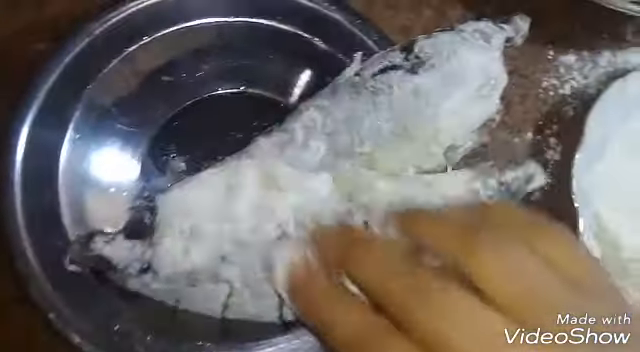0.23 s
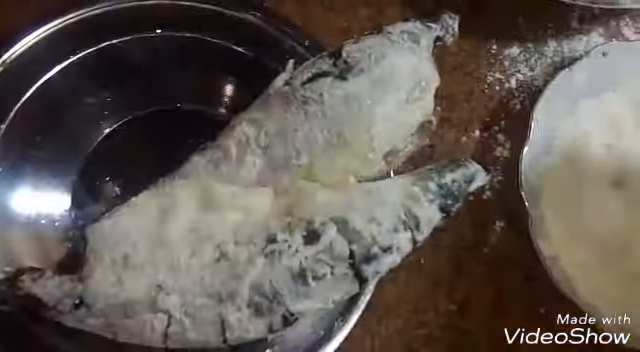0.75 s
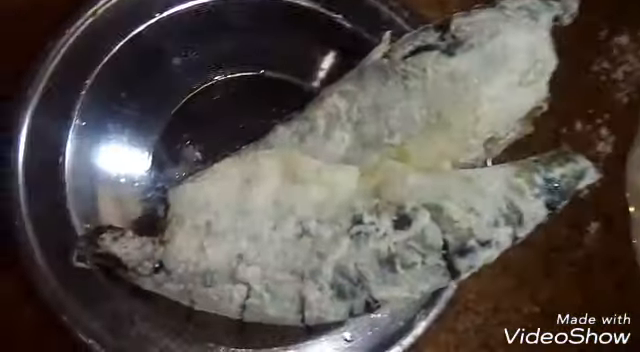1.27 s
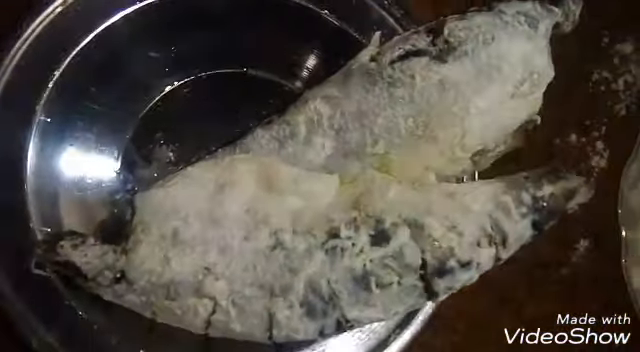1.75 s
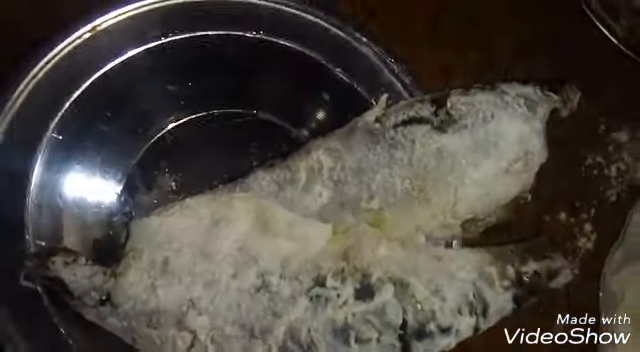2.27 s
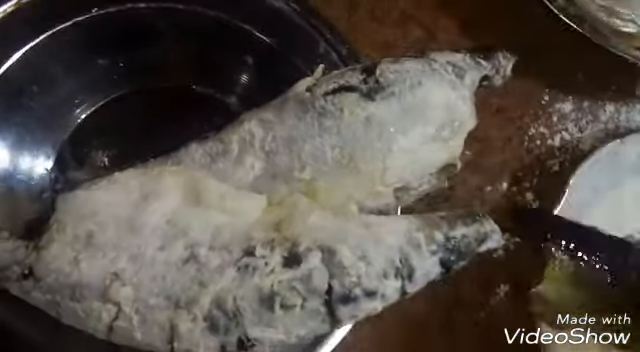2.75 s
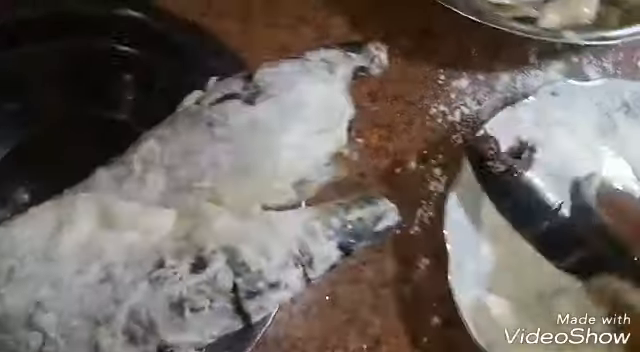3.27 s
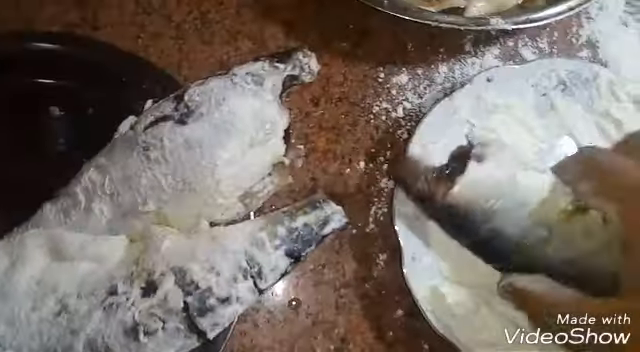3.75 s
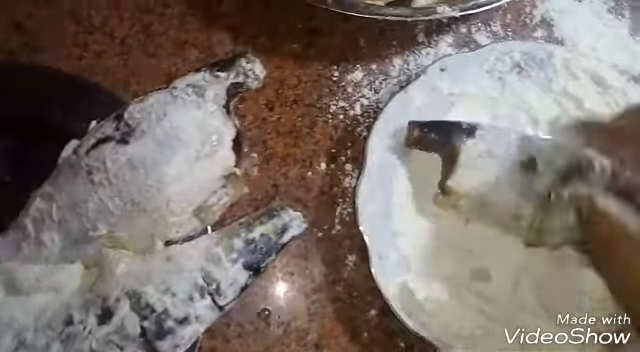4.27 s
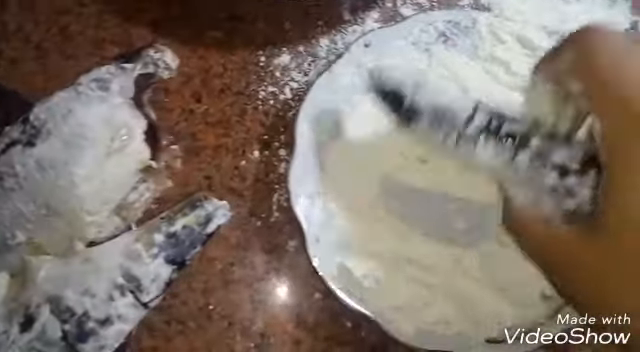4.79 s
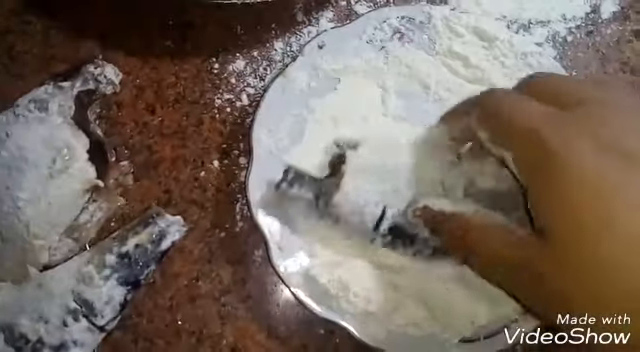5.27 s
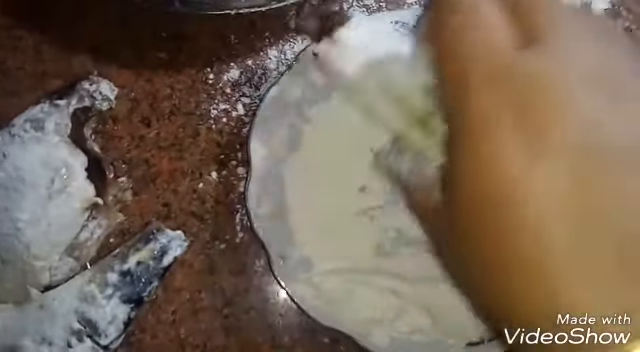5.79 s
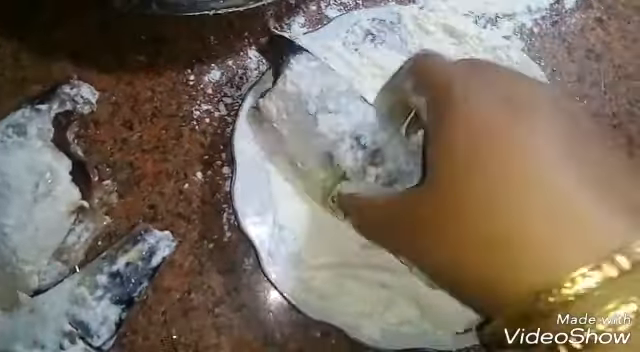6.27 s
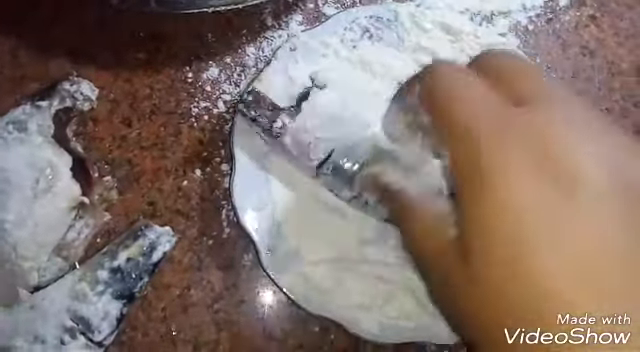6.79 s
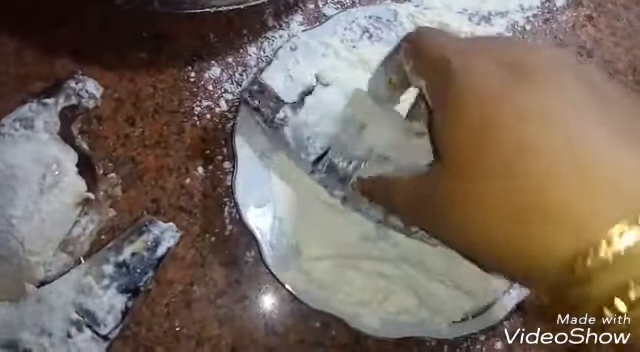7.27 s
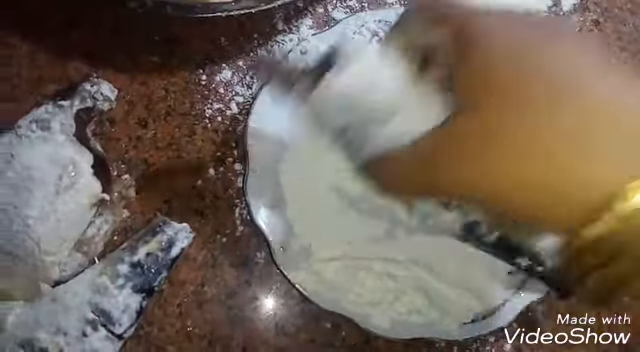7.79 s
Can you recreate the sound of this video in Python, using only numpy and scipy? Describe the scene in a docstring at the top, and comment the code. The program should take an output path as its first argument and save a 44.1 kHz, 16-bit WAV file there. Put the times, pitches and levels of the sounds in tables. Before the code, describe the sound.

Quiet low hum and patchy hiss; brief scuffing pats, tiny ticks, then scattered ceramic clacks on stone, peaking in hard double knocks.

```python
"""A small hard-walled kitchen: a fan hums with one blade tone under a patchy hiss, made from shaped noise and a sine.
First floury fingers pat and rub a fish on a steel dish (noise scuffs through resonances), then a bangle pings
and small things tick (brief partials). From 3.4 s to 6.9 s a plate rocks and knocks on a stone counter, hardest
near 5.1 s (struck modes plus gritty chatter); a last tick follows. Soft low bumps (damped sines) come now and then.
A hand-held phone hears it through two ports; the left one is shaded and dull."""
import sys
import numpy as np
from scipy import signal
from scipy.fft import rfft, irfft, next_fast_len
from scipy.io import wavfile
from scipy.ndimage import uniform_filter1d

SR = 44100
rng = np.random.default_rng(int(sys.argv[2]) if len(sys.argv) > 2 else 0)


def dump(signal):
    """Clip the signal to [-1, 1] and save it as 16-bit WAV at the path in sys.argv[1]."""
    limited = np.clip(np.atleast_2d(signal).T, -1, 1)
    pcm = np.round(limited * 32767).astype(np.int16)
    wavfile.write(sys.argv[1], SR, pcm)


N = 354651

# Fan rumble spectrum: f/Hz, relative level/dB
FAN_SPECTRUM = [(15, -57.5), (25, -41.5), (37, -27.5), (59, -21), (145, -15), (273, -13), (339, -6.5),
                (361, -11), (390, -12.5), (421, -11.5), (531, -16.5), (757, -27.5), (1000, -38),
                (1300, -65.5), (2200, -120)]
# Duct resonances that lift the rumble: f/Hz, width/Hz, lift/dB
DUCT_MODES = [(119.5, 14, 7), (152.1, 3.6, 12), (191.6, 5.2, 4), (353.2, 29, 2.5)]
# Fan rumble as the phone drifts over the counter: t/s, level/dB
FAN_LEVEL = [(0, -50), (.7, -53), (1.2, -50.5), (2.7, -50.5), (3.8, -52), (4.6, -52), (6.4, -52.5),
             (8.04, -52)]
BLADE_HZ = 392.5
BLADE_DB = 4  # peak of the blade tone over the rms of the rumble
FAN_LAG_S = .0003  # the fan reaches the left port later

# Hiss spectrum: f/Hz, relative level/dB
HISS_SPECTRUM = [(410, -21.5), (700, -7.5), (962, -17.5), (1070, -13.5), (1160, -15), (1590, -7),
                 (2230, -12), (3160, -7), (3870, -3), (5720, -1.5), (8100, -27.5), (10500, -64),
                 (17800, -120)]
# Hiss below 1.6 kHz, up to 3.2 kHz and above: t/s, low level/dB, middle level/dB, high level/dB
HISS_LEVEL = [(0, -71, -68, -61), (.4, -65, -64.5, -59), (.67, -70.5, -66.5, -63), (.95, -72.5, -69.5, -65),
              (1.3, -68, -60.5, -61), (1.6, -71.5, -68, -65.5), (1.93, -65.5, -64.5, -62.5),
              (2.4, -69, -67, -64), (3.2, -65, -69, -64.5), (3.6, -64.5, -63.5, -60.5),
              (4.05, -71.5, -68, -63.5), (4.9, -70.5, -69, -63), (5.749, -74, -72.5, -63),
              (6.349, -70.5, -66, -61.5), (6.7, -74.5, -72, -62.5), (7.05, -63.5, -63, -63.5),
              (7.351, -73, -69, -65.5), (7.72, -69.5, -67.5, -61.5), (8.04, -74.5, -69, -64)]
# Faint uneven hiss at the very top: f/Hz, relative level/dB
TOP_HISS_SPECTRUM = [(7500, -60), (8500, 0), (10500, -2), (13000, -8), (15000, -40)]
TOP_HISS_DB = -71

# Bands of the room tail: f/Hz, level/dB, time to fall 60 dB/s
ROOM_BANDS = [(262, -26.5, 0.604), (671.4, -37.5, 0.42), (1330, -32, 0.41), (2470, -36, 0.49),
              (4350, -30, 0.35), (6500, -19, 0.23)]
# Dull bumps: t/s, peak level/dB, f/Hz
BUMPS = [(0.075, -45, 118), (0.98, -42.5, 89), (2.224, -50, 140), (6.301, -44.5, 79.3)]

# Small ticks: t/s, peak level/dB, f/Hz
TICKS = [(1.755, -37, 3620), (1.770, -40, 3020), (1.7898, -38, 2960), (1.8208, -32, 3790),
         (2.2036, -44.5, 6040), (4.639, -41.5, 4970), (4.9277, -46.5, 6500), (5.6983, -49, 3036),
         (7.6591, -48, 4170)]
TICK_T60_S = .018
# A bangle touches its neighbour: t/s, peak level/dB
CLINKS = [(1.437, -32.5)]
# Modes of the bangle: f/Hz, relative level/dB, time to fall 60 dB/s
BANGLE_MODES = [(5220, 0, .05), (6280, -2, .035), (7600, 0, .05), (10300, 8, .035), (11000, 12, .03)]

# Floury fingers sliding on the fish between the pats: t/s, level/dB
RUB_LEVEL = [(0, -74), (.04, -47.5), (.13, -51), (.2, -61), (.3, -55.5), (.36, -64), (.42, -65), (.47, -81),
             (.62, -77)]
# Fingers patting the fish: t/s, peak level/dB, dish note f/Hz, flour rustle level/dB, fade/ms
PATS = [(0.036, -36.5, 2180, 7, 25), (0.05, -28, 2040, -11, 5.6), (0.102, -36.5, 2010, -5, 13.4),
        (0.1145, -46, 1950, 7, 15), (0.169, -43, 1980, -17, 5.6), (0.22, -41.5, 1930, -11, 8.9),
        (0.2638, -39.5, 2540, -14, 7.2), (0.2953, -37.5, 1940, -14, 5.3), (0.374, -43, 1930, -11, 10),
        (0.4015, -30, 1920, -26, 5.6), (0.412, -42.5, 1890, 2, 5.9), (0.603, -46.5, 1860, -4.5, 12)]
PAT_RISE = .33  # share of the fade that a scuff takes to build

# Plate rim on stone: t/s, peak level/dB, brightness/(dB an octave), low body lift/dB, ring lift/dB,
#   left minus right/dB, weight in the counter/dB, chatter fade/ms, body f/Hz, favoured note f/Hz
KNOCKS = [(3.3775, -21, -3.5, 0, -8, -10, -38, 0.96, 768, 1450),
          (3.384, -21.5, -3, 7.5, -6, -2, -16, 5.2, 794, 2500),
          (3.651, -41.5, -3, 19, -15, -9, -3, 2.6, 780, 2010),
          (3.660, -37, 3.5, 19, -4, -8, -2.5, 3, 755, 2500),
          (4.245, -37.5, -5.5, -1, -21, -11, -24, 2.1, 766, 1450),
          (4.251, -28, -4.5, 0, -2, -4.5, -14, 1.3, 730, 2930),
          (4.289, -31.5, -6, 2, -6, -11, -38, 2, 780, 1600),
          (4.3015, -11, -3.5, -7.5, -2, -1.5, -29.5, 4.5, 860, 1600),
          (4.3109, -9.5, -1.5, -10.5, -5.5, 1, -30, 3.6, 760, 2740),
          (4.3175, -17, -2, 4.5, -7, -3.5, -20, 3.5, 750, 1880),
          (5.1065, -1.5, .5, -6, 5, 3, -38, 6, 690, 3000), (5.1172, -1, .5, -4, 3, -1, -37, 4, 670, 2200),
          (5.122, -8, 0, -5, 3, -1, -36, 5, 670, 1850), (5.1970, -2.5, .5, -6, 1, 4, -32, 5, 720, 1850),
          (5.2052, -1.5, 0, -6, -1, -1, -32, 4.5, 670, 1600),
          (5.374, -10.5, 1, -1, -2, -1, -40, 3.7, 667, 2520),
          (5.3773, -7.5, 2.5, -2.5, -3.5, 7, -28, 5, 657, 2100),
          (5.996, -41, -7, 7, -5, -5.5, -2, 2.5, 736, 1610),
          (6.004, -43.5, -14.5, 4.5, -1, -9, -11, 2.5, 750, 1600),
          (6.03, -30.5, -1, 15, -5.5, -3, -7, 2, 717, 1830),
          (6.045, -35.5, -4, 7, -11, -11.5, -29, 3.3, 736, 1600),
          (6.0547, -34.5, -3, 6, -14.5, 0.5, -13, 2.4, 720, 2140),
          (6.8742, -33, -2, 4.5, -3.5, -7, -32, 1.3, 736, 3000),
          (6.880, -32.5, -9, 10.5, -15.5, -4, -33, 10, 746, 1600),
          (6.9, -29.5, -0.5, 5, -17, -4, -24, 1.4, 735, 2500),
          (6.9035, -31, -6, 10, -11.5, -3, -20, 6.6, 750, 1620)]
# Modes of the plate before each blow reshapes them: f/Hz, relative level/dB, time to fall 60 dB/s
PLATE_MODES = [(422, -1.5, 0.016), (640, 1, .025), (670, 3.5, 0.035), (720, -2.5, 0.038),
               (766, -3.5, 0.027), (810, -2, .035), (957, 3, 0.014), (1060, 0, .015), (1450, -6, 0.04),
               (1600, 1, 0.022), (1834, 0.5, .028), (1990, -1.5, 0.01), (2058, -5.5, 0.07),
               (2200, -3, .035), (2330, -8, 0.05), (2483, -8, 0.07), (2585, -7, 0.05), (2730, -4, .03),
               (2997, 1, 0.029), (3110, -6, .05), (3230, -9, 0.05), (4258, -8, 0.017), (4970, -3, .03),
               (3565, -3, .06), (3625, -3, .06), (4700, -4, .045), (4910, -5, .07), (4990, -6, .05),
               (6264, -20, .08), (6672, -13, .05), (7500, -23, .04), (10380, -11, 0.06), (10300, 0, .012),
               (10900, 2, .01), (11300, 2, .01), (12660, 4, 0.009)]
# Modes of the stone counter: f/Hz, relative level/dB, time to fall 60 dB/s
COUNTER_MODES = [(114, -1.5, 0.11), (272, -1, 0.1), (356, 8.5, 0.05)]
# The rim chatters on grit and flour for a few ms: f/Hz, relative level/dB
CHATTER_SPECTRUM = [(250, -41.5), (500, -14.5), (900, -9), (1250, -21), (1600, -0.5), (2800, -1.5),
                    (3600, -2.5), (4200, -10.5), (5000, -15), (5600, -15.5), (8000, -25), (12000, -39)]
CHATTER_DB = 8  # gain of the chatter when mixed with the modes
SOFT_BODY = 0.52  # the softer the blow, the more its body gathers at the body pitch (dB per dB)
BODY_FOCUS_DB = -2  # further level of the low modes away from the body pitch
NOTE_DB, NOTE_SPREAD = 5, 0.05  # lift of modes around the favoured note; its width as a share of the pitch
RING_DOUBLES_DB = 16  # so much more ring doubles the decay time of the upper modes

# The plate lies towards the left port: f/Hz, left gain/dB
PLATE_LEFT = [(300, 11.5), (1000, 7), (2200, 5.5), (4000, -2), (8000, -6)]
# Shading of the left port against the right: f/Hz, gain/dB
LEFT_PORT = [(50, 3.5), (150, -2.5), (350, -7.5), (900, -7.5), (1600, -9), (2600, -11.5), (4500, -19),
             (8000, -12)]
TOP_HZ = 8300  # upper limit of the phone


def undb(db):
    """Turns decibels into an amplitude factor."""
    return 10 ** (np.asarray(db) / 20)


def unit(x):
    """Scales to an rms of 1 over all channels together."""
    return x / np.sqrt(np.mean(x ** 2))


def seconds(count):
    """Time axis of so many samples."""
    return np.arange(count) / SR


def colour(x, table):
    """Shapes the spectrum along (Hz, dB) points, straight over log frequency."""
    hz, db = np.transpose(table)
    size = next_fast_len(N)
    f = np.maximum(np.fft.rfftfreq(size, 1 / SR), 1)
    gain = undb(np.interp(np.log(f), np.log(hz), db))
    return irfft(rfft(x, size) * gain, size)[..., :N]


def band(x, hz, width):
    """Two-pole resonance with a gain of 1 at its peak."""
    return signal.lfilter(*signal.iirpeak(hz, hz / width, SR), x)


def walk(rate):
    """Random levels held 1 / rate s and slewed twice; spread near 1."""
    k = int(SR / rate)
    steps = np.repeat(rng.standard_normal(N // k + 1), k)
    return 1.3 * uniform_filter1d(uniform_filter1d(steps, k), k)[:N]


def build(t, rise):
    """Straight onset from 0 to 1."""
    return (t / rise).clip(0, 1)


def ring(hz, gain, t60, phase, rise):
    """Decaying modes set off together by a contact that takes a moment to build."""
    t = seconds(SR // 6)
    decay = np.exp(-np.log(1000) * t / np.maximum(t60, .003)[:, None])
    modes = np.sin(2 * np.pi * hz[:, None] * t + phase[..., None]) * decay
    return np.sum(gain[..., None] * modes, axis=-2) * build(t, rise) ** 2


def add(out, sound, s, db):
    """Mixes a sound in at a time, with db as the peak of its two-port mean."""
    i = int(s * SR)
    sound = sound[:, :N - i]
    out[:, i:i + sound.shape[1]] += sound * undb(db) / np.max(np.abs(sound.mean(axis=0)))


def fan():
    """Broad rumble partly shared by the ports, lifted by wavering duct resonances, with a wandering blade tone."""
    fan_db = np.interp(seconds(N), *np.transpose(FAN_LEVEL))
    noise = rng.standard_normal((3, N))
    shared = np.array([np.roll(noise[0], int(FAN_LAG_S * SR)), noise[0]])
    rush = colour(shared + 0.6 * noise[1:], FAN_SPECTRUM)
    rush = rush + sum(undb(db + 2 * walk(5)) * band(rush, hz, width) for hz, width, db in DUCT_MODES)
    phase = 2 * np.pi * np.cumsum(BLADE_HZ + 1.509 * walk(4.2)) / SR
    port_phase = np.array([[-2 * np.pi * BLADE_HZ * FAN_LAG_S], [0]])
    blade = undb(fan_db + BLADE_DB + walk(12.0)) * np.sin(phase + port_phase)
    return unit(rush) * undb(fan_db + 0.93 * walk(4.4)) + blade


def hiss():
    """Patchy noise unrelated left and right, in narrow bands that each flicker on their own."""
    s, *columns = np.transpose(HISS_LEVEL)
    low_db, middle_db, high_db = (np.interp(seconds(N), s, c) for c in columns)
    white = colour(rng.standard_normal((2, N)), HISS_SPECTRUM)
    centres = 800 * 2 ** (np.arange(34) / 10)  # ten bands an octave
    # a different time shift for each band keeps neighbours unrelated
    bands = [undb(3.5 * walk(14)) * band(np.roll(white, int(3 * hz), axis=1), hz, hz / 14) for hz in centres]
    low = unit(sum(bands[:10])) * undb(low_db)
    middle = unit(sum(bands[10:20])) * undb(middle_db)
    high = unit(sum(bands[20:])) * undb(high_db)
    top = unit(colour(rng.standard_normal((2, N)), TOP_HISS_SPECTRUM))
    return low + middle + high + top * undb(TOP_HISS_DB + 3 * walk(15))


def room(x):
    """Hard walls answer with a dense tail, different at each port, shortest in the treble."""
    t = seconds(int(.8 * SR))
    tail = 0
    for hz, db, t60 in ROOM_BANDS:
        noise = band(rng.standard_normal((2, len(t))), hz, 0.33 * hz)
        # wider bands pass more noise, so even that out
        tail = tail + undb(db) * noise / np.sqrt(hz / 1000) * np.exp(-np.log(1000) * t / t60)
    tail = tail * build(t, 0.02182)
    return signal.fftconvolve(x.mean(axis=0)[None], tail, axes=1)[:, :N]


def bumps():
    """Soft low pushes, heavily damped sines of a few cycles, fed stronger to the left."""
    out, t = np.zeros((2, N)), seconds(SR // 8)
    for s, peak_db, hz in BUMPS:
        push = np.sin(2 * np.pi * hz * t) * t * np.exp(-t / 0.0088)
        add(out, push * undb([[2.5], [-2.5]]), s, peak_db)
    return out


def ticks():
    """Tiny hard contacts: a rough click and a few brief partials."""
    out, t = np.zeros((2, N)), seconds(SR // 6)
    for s, peak_db, hz in TICKS:
        partials = hz * np.array([.7, 1, 1.2, 1.46])
        gain = undb([-8, 0, -6, -14] + 3 * rng.standard_normal(4))
        notes = ring(partials, gain, TICK_T60_S * np.ones(4), np.zeros((2, 4)), .0005)
        click = rng.standard_normal(len(t))
        for _ in range(2):
            click = band(click, .9 * hz, 0.5 * hz)
        click = click * build(t, 0.001) * np.exp(-t / 0.006)
        add(out, 0.45 * notes + click, s, peak_db)
    return out


def bangle():
    """Thin metal rings ping briefly in a few high modes."""
    out, (hz, db, t60) = np.zeros((2, N)), np.transpose(BANGLE_MODES)
    for s, peak_db in CLINKS:
        add(out, ring(hz, undb(db), t60, np.zeros((2, len(hz))), .001), s, peak_db)
    return out


def rub():
    """Flour grains catch unevenly under sliding fingers: flickering noise through broad resonances."""
    s, db = np.transpose(RUB_LEVEL)
    grains = rng.standard_normal((2, N)) * undb(5.4 * walk(250) + 3.4 * walk(37))
    body = band(band(grains, 2200, 1800), 2200, 1800)
    treble = band(band(grains, 5000, 3000), 5000, 3000)
    level_db = np.interp(seconds(N), s, db, right=-200)  # silent after the last point
    return unit(body + 0.33 * treble) * undb(level_db)


def pats():
    """A short floury scuff that also stirs the damped steel dish."""
    out, t = np.zeros((2, N)), seconds(SR // 8)
    for s, peak_db, note_hz, rustle_db, fade_ms in PATS:
        fade = fade_ms / 1000
        noise = rng.standard_normal((3, len(t))) * build(t, PAT_RISE * fade) * np.exp(-t / fade)
        # flour grains catch unevenly: a new level every 60 samples
        grain_db = 4 * np.repeat(rng.standard_normal(len(t) // 60 + 1), 60)[:len(t)]
        scuff = (noise[0] + .5 * noise[1:]) * undb(grain_db)
        note = band(band(scuff, note_hz, 540), note_hz, 540)
        dish = note + 0.62 * band(band(scuff, 1060, 600), 1060, 540)
        rustle = scuff
        for _ in range(3):
            rustle = band(rustle, 4000, 3300)
        add(out, dish + undb(rustle_db) * rustle, s, peak_db)
    return out


def counter_thuds():
    """The heavy slab is slow to start moving and answers each knock with a few low modes."""
    out, (hz, db, t60) = np.zeros((2, N)), np.transpose(COUNTER_MODES)
    thud = undb([[1.5], [-1.5]]) * ring(hz, undb(db), t60, 0 * hz, .016)
    for s, peak_db, _, _, _, _, weight_db, *_ in KNOCKS:
        add(out, thud, s, peak_db + weight_db)
    return out


def plate_knocks():
    """Each blow lands elsewhere on the rim, so the modes get new strengths; the ports see them from two angles."""
    out, t = np.zeros((2, N)), seconds(SR // 6)
    hz, db, t60 = np.transpose(PLATE_MODES)
    grit = unit(colour(rng.standard_normal((3, N)), CHATTER_SPECTRUM))
    grit = grit[0] + .7 * grit[1:]
    for s, peak_db, bright_db, body_db, ring_db, pan_db, _, fade_ms, body_hz, note_hz in KNOCKS:
        strength, detune, turn, angle = rng.standard_normal((4, len(hz)))
        rise = .0003 * 2 ** (-bright_db / 2.5)  # a dull blow is a slower push
        onset = build(t, rise) ** 2

        # the low modes carry the body, the high ones the ring
        mode_db = db + 2.5 * strength + bright_db * np.log2(hz / 2000)
        mode_db = mode_db + body_db * (hz < 900) + ring_db * (hz > 3400)
        away = (hz < 1300) * build(abs(hz / body_hz - 1), .1)
        mode_db = mode_db + (SOFT_BODY * peak_db + BODY_FOCUS_DB) * away
        mode_db = mode_db + NOTE_DB * np.exp(-((hz / note_hz - 1) / NOTE_SPREAD) ** 2)
        decay = t60 * 2 ** (ring_db * (hz > 900) / RING_DOUBLES_DB)
        phase = 0.98 * turn + angle * np.array([[0], [.9]]) * hz / 2000
        body = ring(hz * (1 + 0.007 * detune), undb(mode_db), decay, phase, rise)

        # a dull blow also dulls the grit under the rim
        cutoff_hz = 7000 * 2 ** np.clip(bright_db / 3.5, -2, 1)
        fine = grit[:, int(s * SR):][:, :len(t)]
        dull = signal.lfilter(*signal.butter(2, cutoff_hz, fs=SR), fine)
        dull = dull + 0.86 * band(dull, note_hz, 2 * NOTE_SPREAD * note_hz)
        chatter = undb(CHATTER_DB) * dull * onset * np.exp(-t / (fade_ms / 1000))
        add(out, (body + chatter) * undb([[pan_db / 2], [-pan_db / 2]]), s, peak_db)
    return signal.sosfilt(signal.butter(4, 330, "high", fs=SR, output="sos"), out)


def scene():
    """Sums the direct sounds, the room's answer to them, and the low bumps, thuds and air left dry."""
    plate = plate_knocks()
    fingers = pats() + rub()
    small = ticks() + bangle()
    plate_direct = np.array([colour(plate[0], PLATE_LEFT), plate[1]])
    direct = plate_direct + fingers * undb([[4.0], [0]]) + small
    echoes = room(plate + fingers + 0.95 * small)
    return direct + echoes + counter_thuds() + bumps() + fan() + hiss()


def record(dry):
    """The left port is shaded; the phone rounds the loudest peaks and cuts the top."""
    ports = np.tanh(np.array([colour(dry[0], LEFT_PORT), dry[1]]))
    return signal.sosfilt(signal.ellip(7, .2, 32, TOP_HZ, fs=SR, output="sos"), ports)


dry = scene()
out = record(dry)
dump(out)
```